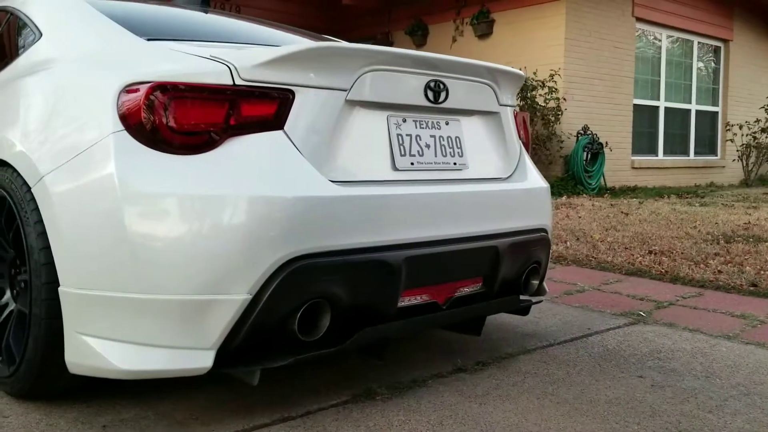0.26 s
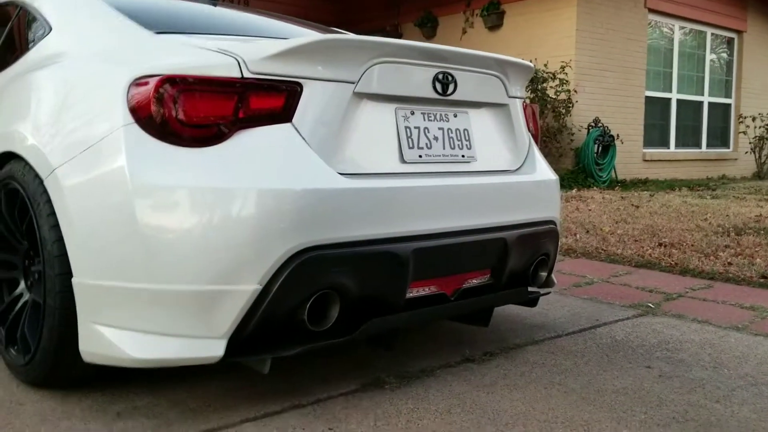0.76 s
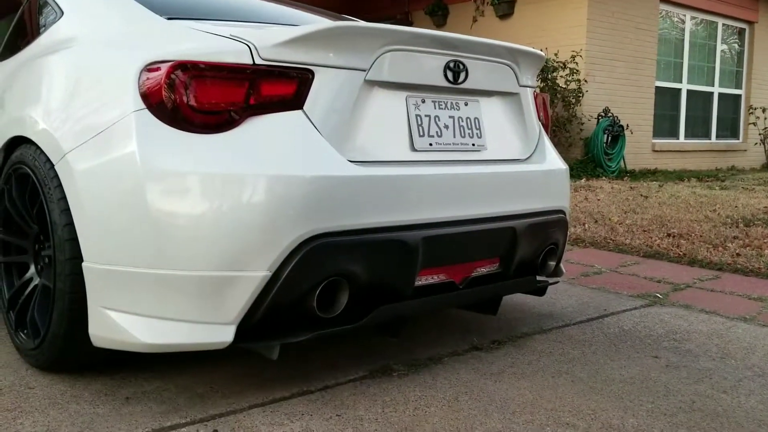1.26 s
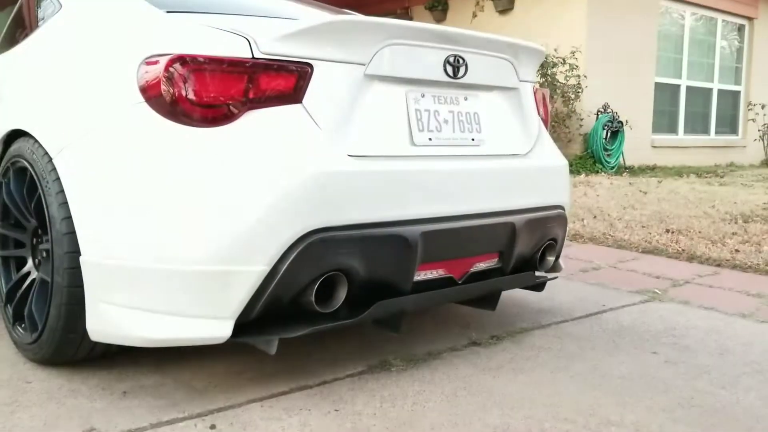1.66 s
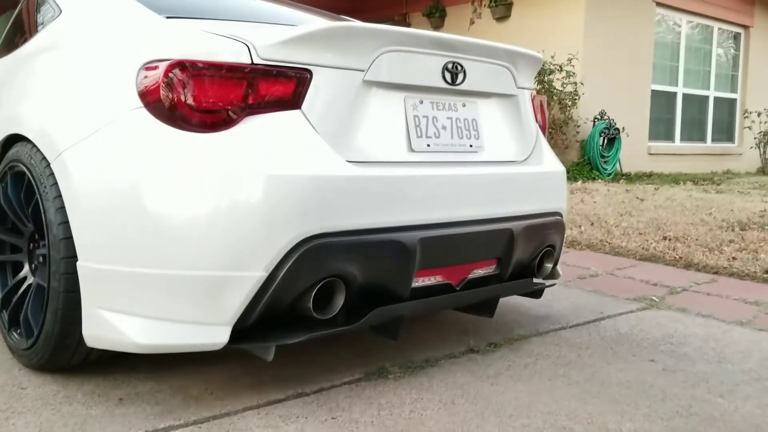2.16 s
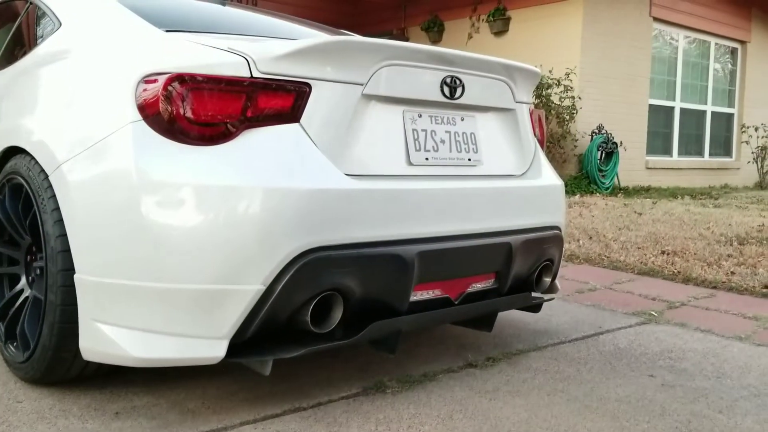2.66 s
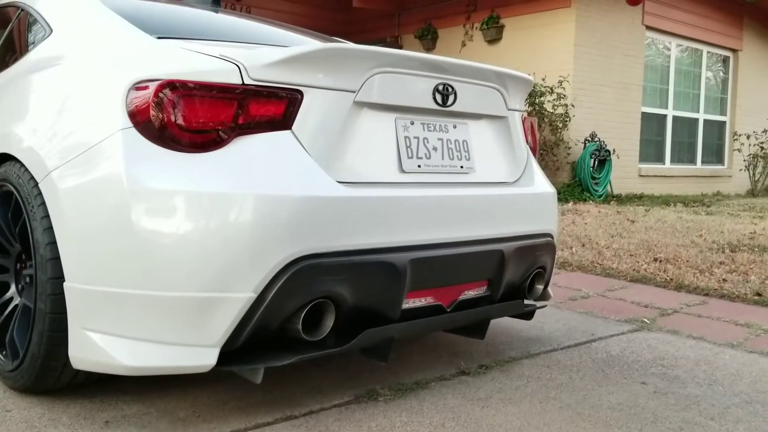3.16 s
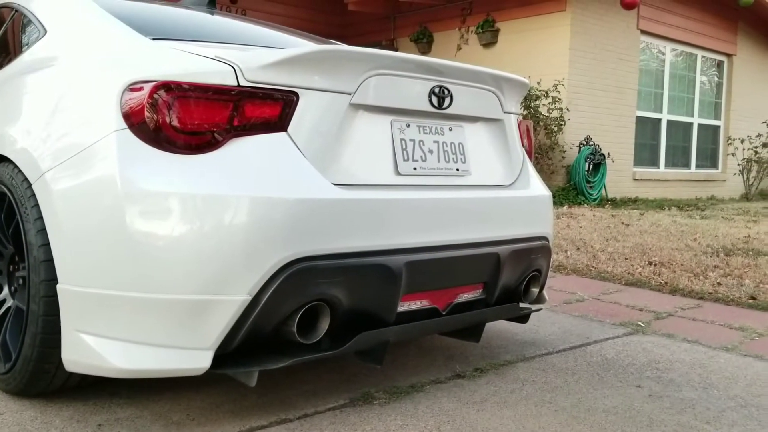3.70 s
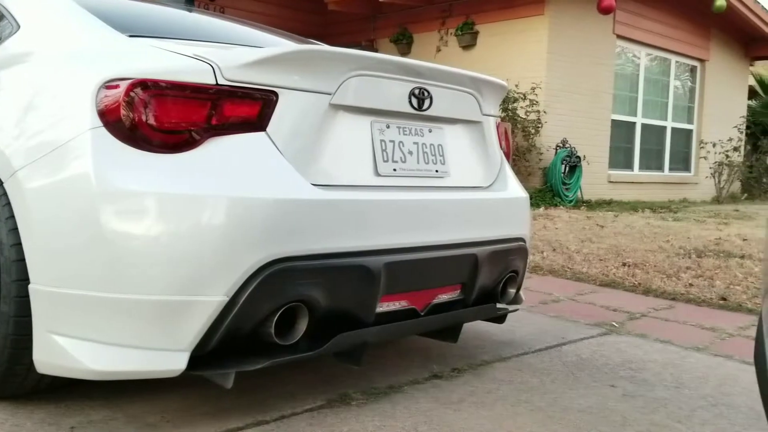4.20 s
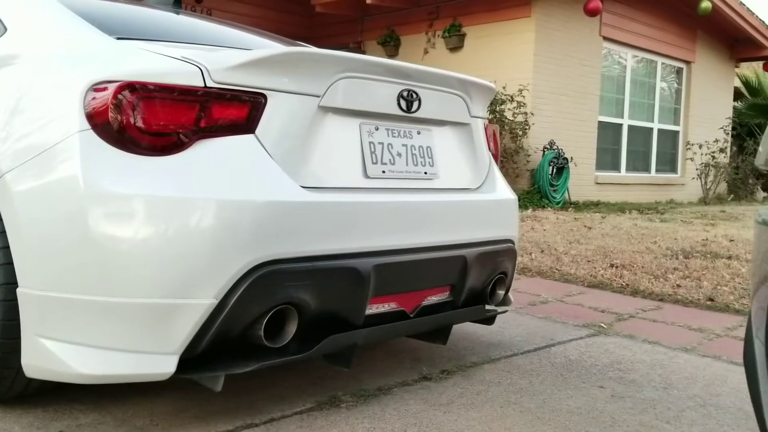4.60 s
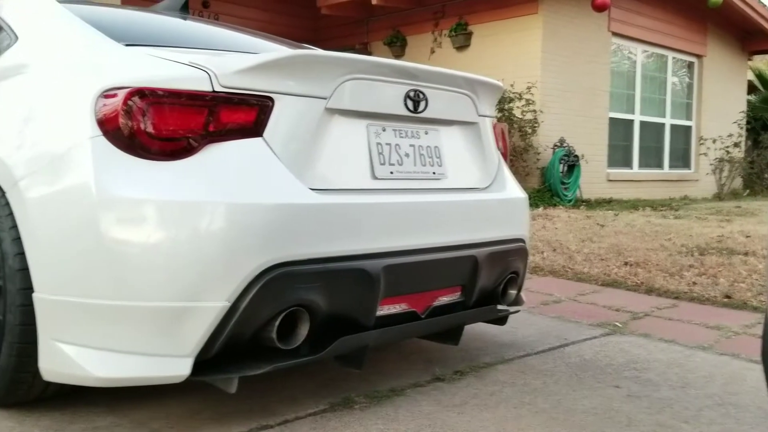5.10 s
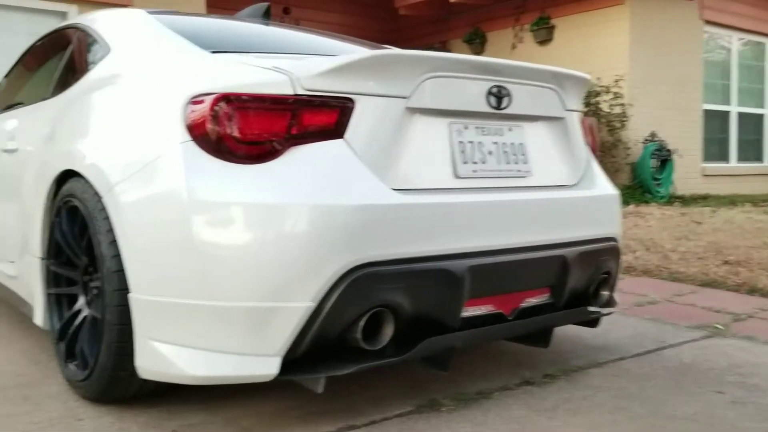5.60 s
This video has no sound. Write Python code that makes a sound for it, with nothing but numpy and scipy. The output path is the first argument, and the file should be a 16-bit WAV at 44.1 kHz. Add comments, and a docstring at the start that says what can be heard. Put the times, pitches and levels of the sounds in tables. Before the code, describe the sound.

A car idles with a low throbbing exhaust rumble, two sharp handling ticks early, then a loud metallic knock and ringing rush at the end.

```python
"""A driveway: a car idles, heard from behind by a hand-held stereo recorder with two microphone ports.
The exhaust note is a sum of locked, wavering sines; low drones are single sagging tones.
Near the end metal knocks, then goes on as a rough ringing rush: random contacts drive resonances.
Fingers on the case make ticks, clicks, rustles and squeaks from pulses, bands of noise and shaken sines.
A singing bird is bending sines with echoes; far traffic, rumble and hiss are shaped noise.
"""
import sys
import numpy as np
from scipy import signal
from scipy.fft import rfft, irfft
from scipy.io import wavfile

SR = 44100
rng = np.random.default_rng(int(sys.argv[2]) if len(sys.argv) > 2 else 0)


def generate_wav(sig):
    """Save sig (samples, or channels by samples) to the path in sys.argv[1] as 16-bit PCM at SR."""
    pcm = np.round(np.clip(np.atleast_2d(sig).T, -1, 1) * 32767).astype(np.int16)
    wavfile.write(sys.argv[1], SR, pcm)


N = 257984


def amp(db):
    """Turn dB into gain."""
    return 10 ** (np.asarray(db) / 20)


def rms_one(x):
    """Scale to rms 1."""
    return x / np.sqrt(np.mean(x ** 2) + 1e-20)


def in_time(rows):
    """Columns of a curve table, sample by sample."""
    seconds, *columns = np.transpose(rows)
    return [np.interp(np.arange(N) / SR, seconds, column) for column in columns]


def window(rows, fade_s):
    """1 while a table lasts, with soft ends."""
    first, last = rows[0][0], rows[-1][0]
    return np.interp(np.arange(N) / SR, [first - fade_s, first, last, last + fade_s], [0, 1, 1, 0])


def envelope(start, rise, hold, fall):
    """Rise, hold and fall between 0 and 1, in seconds."""
    corners = start + np.cumsum([0, rise, hold, fall])
    return np.interp(np.arange(N) / SR, corners, [0, 1, 1, 0])


def at_hz(points, hz):
    """Read a spectrum table on a log frequency axis."""
    table_hz, values = np.array(points)[:, 0], np.array(points)[:, 1]
    return np.interp(np.log(hz), np.log(table_hz), values)


def drift(rate_hz):
    """Smooth random wander of rms 1: noise through two equal low-pass poles."""
    # worked out at every 40th sample, after a run-in
    r = np.exp(-80 * np.pi * rate_hz / SR)
    slow = signal.lfilter([1], [1, -2 * r, r * r], rng.standard_normal(N // 40 + 2002))[2000:]
    return np.interp(np.arange(N) / 40, np.arange(len(slow)), rms_one(slow))


def sides(x, pan_db):
    """Split a left-right difference evenly."""
    return x * amp(np.array([pan_db / 2, -pan_db / 2]).reshape(2, -1))


def resonance(x, hz, width_hz):
    """Two-pole resonance, gain 1 on top."""
    r = np.exp(-np.pi * width_hz / SR)
    zeros = np.array([1, 0, -1]) * (1 - r * r) / 2
    poles = [1, -2 * r * np.cos(2 * np.pi * hz / SR), r * r]
    return signal.lfilter(zeros, poles, x + 1e-18)


def band(x, low_hz, high_hz):
    """Steep band-pass, with its upper edge kept to 0.45 of the sample rate."""
    edges = [low_hz, min(high_hz, .45 * SR)]
    return signal.sosfilt(signal.butter(4, edges, "band", fs=SR, output="sos"), x)


def tone(hz, wander_rad, start_s=0):
    """A sine of rms 1 whose phase wanders about a crest at start_s."""
    turns = np.cumsum(hz) / SR - hz[0] * start_s
    return np.sqrt(2) * np.cos(2 * np.pi * turns + wander_rad * drift(1.8))


def glides(notes, warble, fade):
    """Sines that bend along a parabola through three pitches, loudest half way, the pitch shaken by a share."""
    out = np.zeros(N)
    for s, length, first_hz, middle_hz, last_hz, db in notes:
        at = slice(int((s - fade) * SR), int((s + length + fade) * SR))
        # -1 at the first pitch, 0 half way, 1 at the last
        u = np.clip(2 * (np.arange(N)[at] / SR - s) / length - 1, -1, 1)
        bend = (first_hz + last_hz) / 2 - middle_hz
        hz = middle_hz + u * (last_hz - first_hz) / 2 + u ** 2 * bend
        level = envelope(s - fade, fade, length, fade)[at] * amp(db - 4.5 * u ** 2)
        phase = 2 * np.pi * np.cumsum(hz * (1 + warble[at])) / SR
        out[at] += level * np.sqrt(2) * np.sin(phase)
    return out


# Base rate of the firing pattern. Each row: time in seconds, rate in Hz.
FIRING_RATE = [(0, 19.36), (2.2, 19.33), (3.0, 19.27), (4.3, 19.2), (5.5, 19.06), (5.85, 19.04)]
# Level of the exhaust note at the recorder. Each row: time in seconds, level in dB.
EXHAUST_LEVEL = [(0, -51.5), (.6, -63.5), (1.1, -69), (1.5, -62), (1.85, -51.5), (2.15, -49), (2.45, -50),
                 (2.7, -56.5), (3.2, -49.5), (3.5, -48), (3.85, -45.5), (4.4, -49.5), (4.7, -55),
                 (5.0, -52), (5.4, -46), (5.85, -53)]
# Partials of the exhaust note. Each row: multiple of the base rate, relative level in dB.
EXHAUST_PARTIALS = [(3, -16), (4, -12), (5, -15), (6, -18), (7, -3.5), (8, 2), (9, -13), (10, -21),
                    (11, -18.5), (12, -7.5), (14, -26), (16, -16), (20, -25.5)]
FIRST_FIRING_S = .0135


def exhaust():
    """Multiples of the firing pattern, in step, so that they throb; uneven burns make each swell and waver."""
    (base_hz,), (level_db,) = in_time(FIRING_RATE), in_time(EXHAUST_LEVEL)
    note = 0
    for multiple, db in EXHAUST_PARTIALS:
        swell = amp(db + 1.5 * drift(5.6))
        note = note + swell * tone(multiple * base_hz, wander_rad=.18, start_s=FIRST_FIRING_S)
    return amp(level_db) * note


# Low drones apart from the exhaust note.
# Each row: start in seconds, rise in seconds, hold in seconds, starting pitch in Hz, level in dB.
DRONE_TONES = [(2.78, 0.11, .051, 94.6, -37.6), (2.81, 0.22, .21, 66.8, -36.5),
               (3.167, 0.13, .16, 95.9, -39.5), (3.794, 0.13, 1.95, 94.2, -42.5)]
DRONE_FALL_S, DRONE_SAG_HZ_PER_S = 0.12, 0.66


def drones():
    """Low tones that swell in, sag a little in pitch and die away."""
    out = 0
    for s, rise, hold, hz, db in DRONE_TONES:
        sagging_hz = hz - DRONE_SAG_HZ_PER_S * np.maximum(np.arange(N) / SR - s, 0)
        shape = envelope(s, rise, hold, DRONE_FALL_S) ** 2
        out = out + shape * amp(db + 0.24 * drift(6.3)) * tone(sagging_hz, wander_rad=.3)
    return out


# The rush, set by hand.
# Each row: time in seconds, level of the ringing in dB, level of a faint noise from 2.7 to 13 kHz in dB.
RUSH_LEVEL = [(5.199, -31.5, -82.5), (5.235, -32, -72.5), (5.26, -32.5, -72), (5.3, -29, -69),
              (5.4, -30.5, -70), (5.455, -32.5, -77), (5.49, -28.5, -55), (5.56, -33, -61),
              (5.62, -32.5, -103), (5.69, -30.5, -79.5), (5.81, -28.5, -52.5), (5.85, -30, -56)]
# Knocks on the metal. Each row: time in seconds, strength in dB, extra dB for resonances below 900 Hz.
METAL_KNOCKS = [(5.197, -39, 29), (5.205, -20, 17.5), (5.242, -18.5, 5.5), (5.295, -27.5, 27),
                (5.459, -28.5, -9.5)]
# What rings in the metal. Each row: pitch in Hz, width of the resonance in Hz, relative level in dB.
METAL_RESONANCES = [(433, 44, -28), (754, 87, -24), (1097, 140, -11), (1344, 22, -5.5), (1399, 17.4, -2),
                    (1602, 90, 0), (1760, 172, -7.5), (1920, 224, -14.5), (2544, 370, -17),
                    (2170, 400, -16.5), (2406, 43, -15), (2480, 240, -21.5), (3232, 66, -19.5),
                    (3120, 590, -31.5), (3302, 90, -12), (3606, 87, -18.5), (3713, 375, -25)]
KNOCK_DAMPING_HZ = 44.5   # added width: a knock rings shorter than the rattle
HOLLOW_DB, HOLLOW_FADE_DB_PER_S, HOLLOW_END_DB = 17, 66, -3
FIZZ_DB, FIZZ_BAND_HZ = -31, (11500, 17800)   # level against the ringing


def rush():
    """Dense uneven contacts and a few knocks drive one set of metal resonances, under fizz and faint noise."""
    level_db, faint_db = in_time(RUSH_LEVEL)
    # the hollow low resonances drop out soon after the start
    since = np.maximum(np.arange(N) / SR - RUSH_LEVEL[0][0], 0)
    low_db = np.maximum(HOLLOW_DB - HOLLOW_FADE_DB_PER_S * since, HOLLOW_END_DB)
    # about 6000 contacts a second, of either sign and uneven force
    hits = (rng.random((2, N)) < 6000 / SR) * rng.choice([-1, 1], (2, N))
    contacts = hits * amp(1.2 * np.minimum(rng.exponential(1, (2, N)), 4))
    shared, opposed = contacts * amp(1.8 * drift(90))
    at = [round(row[0] * SR) for row in METAL_KNOCKS]
    knock_db, thud_db = np.transpose(METAL_KNOCKS)[1:]
    rattle, knocks = np.zeros((2, N)), np.zeros(N)
    for k, (hz, width_hz, db) in enumerate(METAL_RESONANCES):
        is_low = hz < 900
        colour = amp(db + low_db * is_low + 0.98 * drift(29.0)) * (-1) ** k
        # the two ports agree in part only
        difference = 0.31 * resonance(opposed, hz, width_hz) * np.array([[1], [-1]])
        rattle += colour * (resonance(shared, hz, width_hz) + difference)
        blows = np.zeros(N)
        blow_db = knock_db + db + thud_db * is_low + rng.normal(0, 1.9, len(at))
        blows[at] = amp(blow_db) * rng.choice([-1, 1], len(at))
        # a knock is a burst of contacts within 70 samples
        blows = np.convolve(blows, rng.standard_normal(70) * np.hanning(70) / 5)[:N]
        damped_hz = width_hz + KNOCK_DAMPING_HZ
        knocks += resonance(blows, hz, damped_hz) * SR / (np.pi * damped_hz)
    rattle = window(RUSH_LEVEL, 0.0093) * amp(level_db) * rattle / np.std(rattle[:, at[0]:])
    # the contacts are blunt: little above 4 kHz
    metal = band(rattle + amp(-2) * band(knocks, 250, 3000), 250, 4100)
    fizz_noise = rms_one(band(rng.standard_normal((2, N)), *FIZZ_BAND_HZ))
    fizz = window(RUSH_LEVEL, 0.09) * amp(level_db + FIZZ_DB) * fizz_noise
    faint_noise = rms_one(band(rng.standard_normal((2, N)), 2700, 13000))
    faint = window(RUSH_LEVEL, 0.033) * amp(faint_db) * faint_noise
    return sides(metal, -1.3) + sides(fizz, 3.3) + faint


# Dull bumps under the rush. Each row: start in seconds, strength in dB, pitch in Hz.
DULL_BUMPS = [(5.203, -14.5, 457), (5.24, -17, 445), (5.294, -18, 315), (5.328, -32, 420),
              (5.386, -23, 195), (5.405, -23.5, 175), (5.554, -23.5, 158.5), (5.674, -29, 278),
              (5.698, -19, 175), (5.726, -20, 196.5), (5.761, -18.5, 178)]


def bumps():
    """Soft low pushes, each a few damped swings."""
    out = np.zeros(N)
    for s, db, hz in DULL_BUMPS:
        turns = np.maximum(np.arange(N) / SR - s, 0) * hz
        swell = (turns / 2.92) * np.exp(1 - turns / 0.86)
        out += amp(db) * swell * np.sin(2 * np.pi * turns)
    return out


# Sharp finger ticks on the case. Each row: time at the left port in seconds, lag of the right port in seconds,
# signed push at the left port, signed push at the right port, rebound pitch at the nearer port in Hz.
CASE_TICKS = [(0.3464, .00047, 0.034, -1, 604), (0.5671, .00005, 0.99, .43, 516)]
TICK_WIDTH_S, TICK_DIP, FAR_REBOUND_PITCH, BUZZ_DB = .00013, 0.45, 2.7, -34


def ticks():
    """A snap through the case: a dip, a spike with a thin crack on top, a damped swing back, a hollow buzz.

    The port further from the finger gets a weaker push, a quicker swing and no dip.
    """
    out, width = np.zeros((2, N)), TICK_WIDTH_S
    for s, lag, left, right, near_hz in CASE_TICKS:
        for port, push in enumerate((left, right)):
            near = abs(push) >= max(abs(left), abs(right))
            hz = near_hz * (1 if near else FAR_REBOUND_PITCH)
            t = np.arange(N) / SR - s - port * lag
            after = np.maximum(t - width, 0)
            dip = near * TICK_DIP * np.exp(-((t + 2.0 * width) / (.9 * width)) ** 2)
            spike = np.exp(-(t / width) ** 2) - dip
            swing = np.exp(-after / 0.00072) * np.sin(2 * np.pi * hz * after)
            swing = swing * np.minimum(after * hz * 4, 1)   # eases in over a quarter turn
            buzz_noise = rms_one(band(rng.standard_normal(N), 280, 1700))
            buzz = (t > 0) * np.exp(-after / 0.024) * buzz_noise
            crack = amp(-31.0) * np.exp(-(t / .00003) ** 2)
            out[port] += push * (spike + crack - swing + amp(BUZZ_DB) * buzz)
    return out


# Small creaks of the case. Each row: time in seconds, strength in dB, ring pitch in Hz, left-right difference
# in dB, width of the narrower ring resonance in Hz, share of the broad tick from 0 to 1.
CASE_CLICKS = [(2.583, -32.5, 2000, -1, 600, 0.83), (3.83, -41.5, 13200, -9, 2970, 0.14),
               (3.8908, -51, 1500, -16, 910, 0.53), (4.004, -62, 1490, 11, 600, 0.3),
               (4.06, -32, 2020, 4, 246, 0.63), (4.997, -50.5, 1650, -2, 600, 0.5),
               (5.121, -43, 14300, 21.5, 2030, 0.2)]


def clicks():
    """Small creaks of the case: a broad tick with one ring."""
    out = np.zeros((2, N))
    for s, db, hz, pan_db, width_hz, broad in CASE_CLICKS:
        push = np.zeros(N)
        push[round(s * SR)] = 1
        ring = resonance(resonance(push, hz, width_hz), hz, 3.2 * width_hz)
        ring = (1 - broad) * ring / np.max(np.abs(ring))
        tick = broad * band(push, 900, 22000)
        out += sides(amp(db) * (ring + tick), pan_db)
    return out


# Short bursts of noise: finger slides, then a fizz leading in the rush and a burst at its knock.
# Each row: start in seconds, rise in seconds, hold in seconds, level of the top, middle and low noise bands
# in dB, left-right difference of the top band in dB.
NOISE_BURSTS = [(0.284, 0.012, .12, -105, -74, -79, -36), (0.335, .004, 0.046, -79, -85, -59.5, 18),
                (0.445, 0.038, 0.045, -60, -55.5, -55, 43.5), (0.562, 0.0032, 0.09, -59, -65, -51.5, 27.5),
                (.565, .003, 0.042, -83, -57.5, -57.5, -18.5), (0.601, 0.034, 0.067, -67, -59, -58.5, 9),
                (2.572, 0.009, 0.021, -56, -66, -64, 10), (2.604, .01, 0.039, -79, -88, -75, 2),
                (2.778, 0.052, .13, -60, -80, -72, -2), (2.832, .025, 0.03, -74, -59, -68, -34),
                (3.047, 0.016, .1, -67.5, -80, -74, -3), (3.825, .003, 0.046, -66.5, -101, -97, 0),
                (3.877, 0.015, 0.012, -88, -70.5, -88, -26), (4.058, 0.0025, .004, -59.5, -69, -75, -6),
                (4.07, .004, 0.042, -64, -97, -86, 1), (5.126, 0.011, 0.21, -66, -97, -76, 9),
                (5.455, 0.0053, 0.0053, -51, -54.5, -70, 3)]
TOP_FADE_DB_PER_S, LOWER_FADE_DB_PER_S, LOWER_PAN_SHARE = 252.5, 350, 0.27


def noise_bursts():
    """Grainy noise in three bands that rises, holds and fades, with a set left-right balance."""
    grain = rng.standard_normal((2, N)) * amp(2.3 * drift(71.4))
    top = rms_one(band(grain, 9650, 21000))
    middle = rms_one(band(grain, 5130, 8060))
    low = rms_one(band(grain, 1780, 4020))
    power = np.zeros((3, 2, N))
    for s, rise, hold, top_db, middle_db, low_db, pan_db in NOISE_BURSTS:
        t = np.arange(N) / SR - s
        onset = np.clip(t / rise, 0, 1) ** 2
        past = np.clip(t - rise - hold, 0, .5)
        upper = sides(onset * amp(-TOP_FADE_DB_PER_S * past), pan_db)
        # the lower bands fade faster and lean less to one side
        lower = sides(onset * amp(-LOWER_FADE_DB_PER_S * past), LOWER_PAN_SHARE * pan_db)
        power += np.array([amp(top_db) * upper, amp(middle_db) * lower, amp(low_db) * lower]) ** 2
    return np.sum(np.sqrt(power) * [top, middle, low], axis=0)


# Breathy skin squeaks on the case. Each row: start in seconds, length in seconds,
# first, middle and last pitch in Hz, level half way in dB.
SKIN_SQUEAKS = [(.59, 0.045, 2800, 2910, 2830, -49.5), (2.78, 0.088, 2450, 2560, 2490, -67.5),
                (2.81, 0.11, 3620, 3400, 3080, -65.5), (3.085, 0.034, 3160, 3230, 3040, -59.5)]


def squeaks():
    """Stick and slip so uneven that the pitch spreads into a narrow hiss."""
    ports = []
    for side_db in (1.0, -1.0):
        squeak = glides(SKIN_SQUEAKS, warble=0.03 * drift(255.7), fade=0.018)
        ports.append(squeak * amp(4.7 * drift(150) + side_db))
    return np.array(ports)


# Bird notes, each one bend of pitch. Each row: start in seconds, length in seconds,
# first, middle and last pitch in Hz, level half way in dB.
BIRD_NOTES = [(.385, 0.06, 3500, 3080, 2900, -63.5), (1.115, 0.057, 3340, 3240, 3060, -80),
              (1.19, .062, 3120, 3510, 2950, -74), (1.255, 0.03, 3450, 3450, 2700, -73),
              (1.345, .045, 3310, 3160, 3120, -81.5), (1.4, 0.096, 2575, 2710, 2470, -75),
              (1.565, 0.055, 2350, 2360, 2360, -84.5), (1.82, 0.18, 2783, 2970, 2750, -69.5),
              (1.86, .04, 2700, 2570, 2360, -65.5), (1.912, .05, 2900, 3360, 2920, -59.5),
              (1.97, .04, 3300, 3400, 3340, -77), (1.99, 0.09, 2440, 2360, 2290, -73.5),
              (2.265, 0.085, 2500, 2665, 2380, -69), (2.9, 0.089, 2780, 2830, 2860, -66),
              (3.055, 0.024, 7600, 7700, 7760, -68), (3.112, 0.0168, 3000, 2615, 2060, -61.5),
              (3.49, 0.073, 2840, 2710, 2530, -67), (3.51, 0.046, 2523, 2280, 2000, -76),
              (3.595, 0.047, 2505, 2770, 2890, -62.5), (3.67, 0.11, 2820, 2870, 2730, -76),
              (4.33, 0.079, 3120, 3330, 3090, -70.5), (4.47, 0.062, 2350, 2400, 2400, -76),
              (5.02, 0.071, 3010, 3185, 3190, -67)]


def bird():
    """Whistled notes from afar, fluttering in the air and smeared by echoes off the houses."""
    song = glides(BIRD_NOTES, warble=.01 * drift(160), fade=.006) * amp(3.0 * drift(60))
    t = np.arange(int(.3 * SR)) / SR
    echoes = rng.standard_normal((2, len(t))) * np.exp(-t / .05)
    echoes = echoes / np.sqrt(np.sum(echoes[0] ** 2))
    tail = signal.fftconvolve(song[None], echoes, axes=1)[:, :N]
    # the song reaches the right port 5 samples later
    return np.array([song, np.roll(song, 5)]) + amp(-3.5) * tail


# How alike the two ports hear noise. Each row: frequency in Hz, left-right likeness from -1 to 1.
PORT_LIKENESS = [(60, 1), (130, 0.94), (290, 0.66), (640, 0.36), (1410, -0.29), (3100, -0.33),
                 (6820, -0.57), (15000, -0.018)]


def coloured(spectrum):
    """Stereo noise with a spectrum and a likeness for each pitch; mid rms 1."""
    hz = np.maximum(np.arange(N // 2 + 1) * SR / N, 1)
    alike = np.clip(at_hz(PORT_LIKENESS, hz), -1, 1)
    mid, side = rfft(rng.standard_normal((2, N))) * amp(at_hz(spectrum, hz))
    out = irfft(np.sqrt(1 + alike) * mid + np.sqrt(1 - alike) * side * np.array([[1], [-1]]), N)
    return out / np.std(out.mean(axis=0))


# Colour of the low rumble. Each row: frequency in Hz, relative level in dB.
RUMBLE_SPECTRUM = [(13, -65), (22, -23), (102, 3), (166, -7), (198, -6.5), (216, -9.5), (312, -20),
                   (332, -23.5), (420, -22.5), (550, -58.5), (920, -120)]
# Colour of the far traffic. Each row: frequency in Hz, relative level in dB.
TRAFFIC_SPECTRUM = [(180, -23), (300, -2), (372, -14.5), (426, -11.5), (500, -6), (547, -9.5), (795, -11),
                    (861, -11), (1010, -9.5), (1160, -12), (1430, -15.5), (2640, -33), (4500, -55.5),
                    (5850, -71), (9900, -120)]
# Colour of the hiss. Each row: frequency in Hz, relative level in dB.
HISS_SPECTRUM = [(1760, -26.5), (3000, -6), (3190, -12), (3560, -11), (13900, -13.5), (14800, -8.5),
                 (15500, -34.5)]
# Gain of the whole background, which sinks early on and comes back. Each row: time in seconds, gain in dB.
BACKGROUND_GAIN = [(0, 0.5), (.22, -2), (.5, -3.5), (.95, -6), (1.5, -10.5), (1.73, -6.5), (2.0, -0.5),
                   (3.5, 0.5), (4.6, 0), (5.17, 0)]
# Far traffic swells and fades on top of that. Each row: time in seconds, level in dB before that gain.
TRAFFIC_SWELL = [(0, -52), (.5, -54), (.7, -57.5), (1.5, -56), (2.0, -60), (2.5, -57), (2.8, -58.5),
                 (3.28, -61.5), (3.67, -59.5), (4.03, -59), (4.55, -56.5), (4.95, -64), (5.2, -55.5),
                 (5.85, -60.5)]
RUMBLE_DB, HISS_DB = -44, -79.5   # before the background gain
PUFF_DEPTH = .18   # rms share of the rumble's swell at the base rate


def background():
    """Rumble that puffs with the firing pattern, far tyre noise and hiss."""
    (gain_db,), (traffic_db,) = in_time(BACKGROUND_GAIN), in_time(TRAFFIC_SWELL)
    (base_hz,) = in_time(FIRING_RATE)
    puffs = 1 + PUFF_DEPTH * tone(base_hz, wander_rad=0.21, start_s=FIRST_FIRING_S)
    rumble = amp(RUMBLE_DB + 1.4 * drift(5.2)) * puffs * coloured(RUMBLE_SPECTRUM)
    traffic = amp(traffic_db + 1.5 * drift(3.3)) * coloured(TRAFFIC_SPECTRUM)
    hiss = amp(HISS_DB) * coloured(HISS_SPECTRUM)
    return amp(gain_db) * (rumble + traffic + hiss)


def scene():
    """Everything at the two ports."""
    short_sounds = ticks() + clicks() + noise_bursts() + squeaks()
    return exhaust() + drones() + background() + short_sounds + bird() + rush() + bumps()


def record(dry):
    """The deepest bass is lost below 40 Hz and the top is cut steeply above 14.6 kHz."""
    bass_cut = signal.sosfilt(signal.butter(2, 40, "high", fs=SR, output="sos"), dry)
    # 0.5 dB ripple below the cut, 55 dB down above it
    top_cut = signal.ellip(10, .5, 55, 14600, fs=SR, output="sos")
    return signal.sosfilt(top_cut, bass_cut)


dry = scene()
out = record(dry)
generate_wav(out)
```